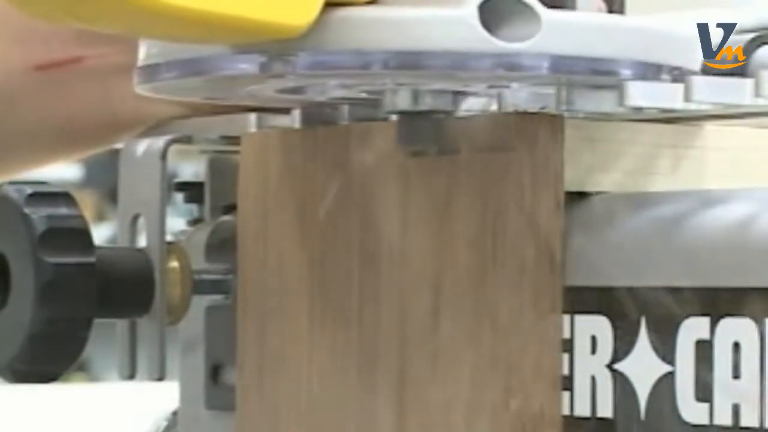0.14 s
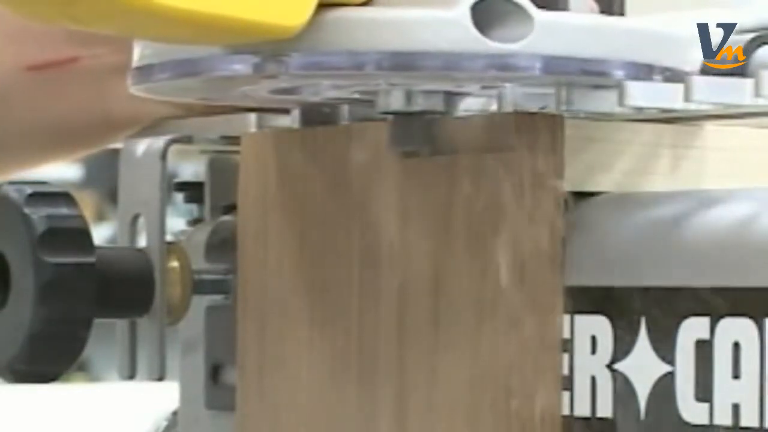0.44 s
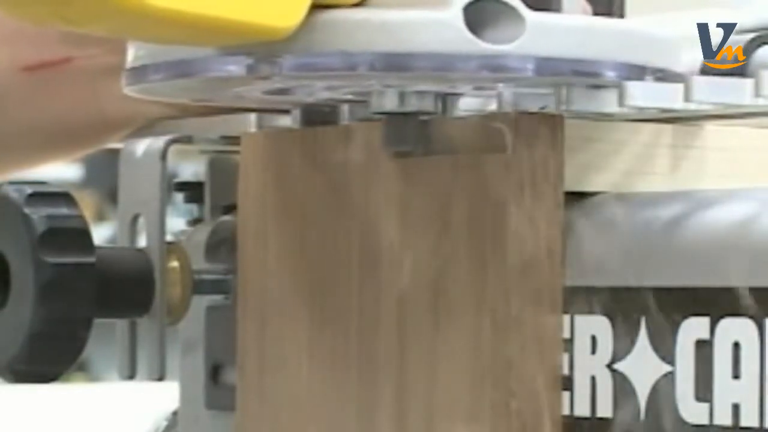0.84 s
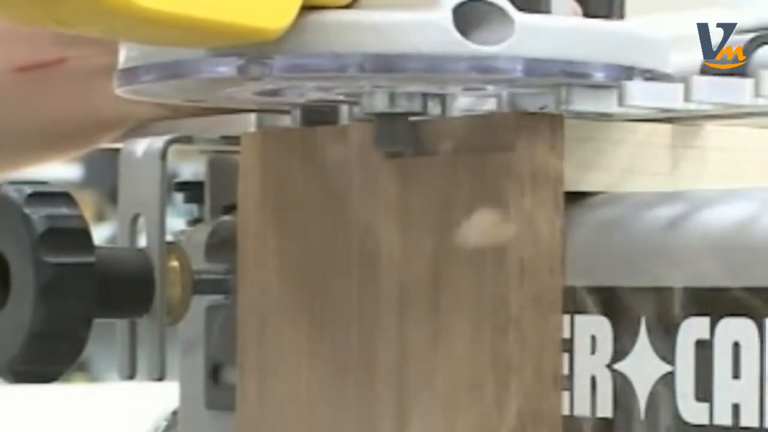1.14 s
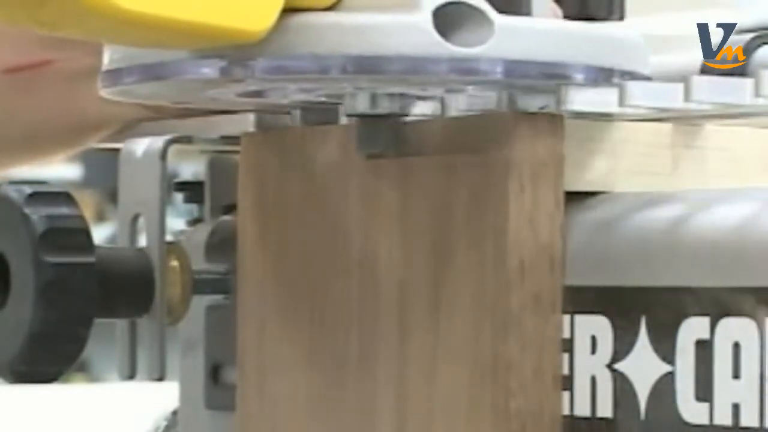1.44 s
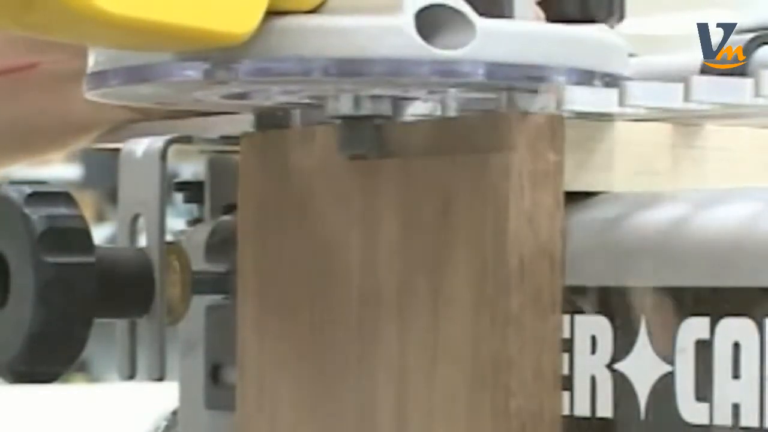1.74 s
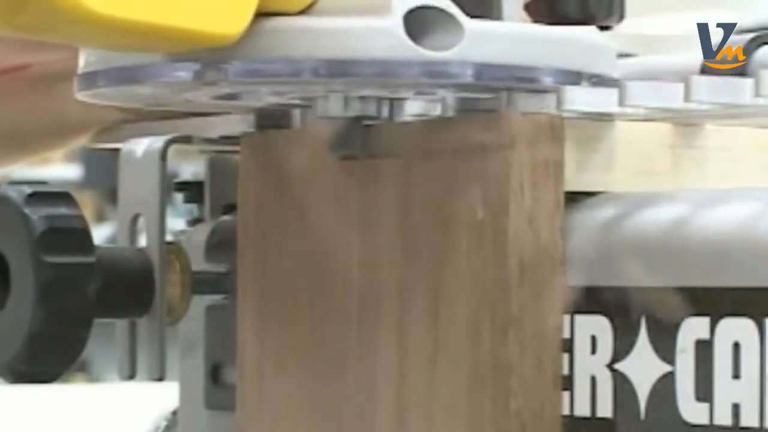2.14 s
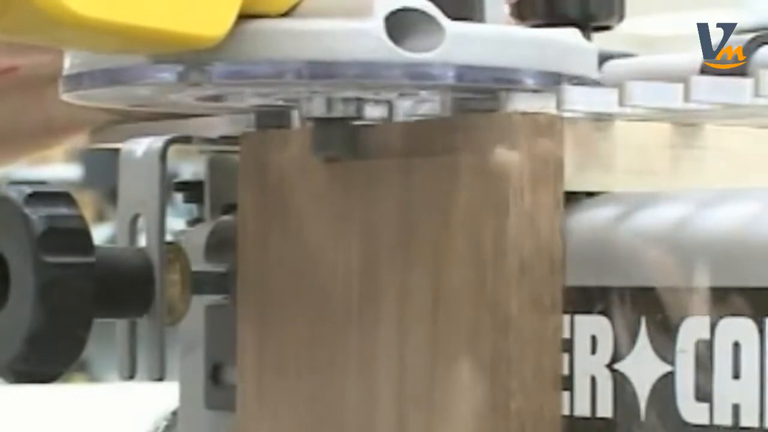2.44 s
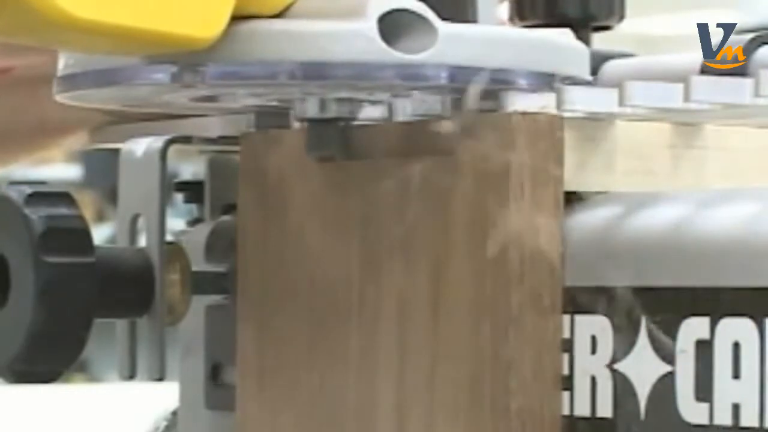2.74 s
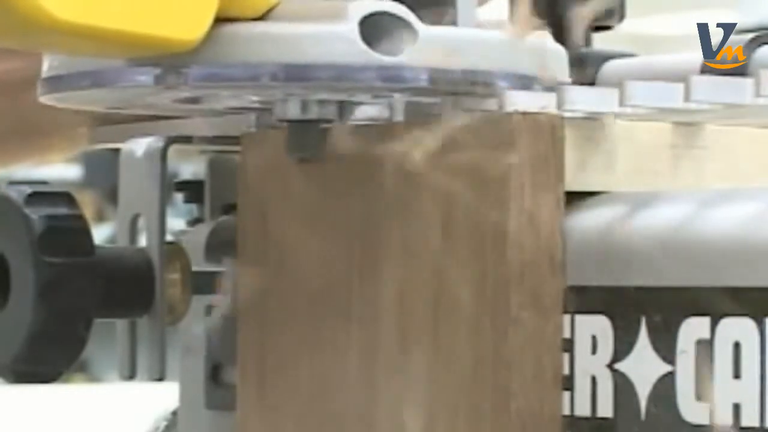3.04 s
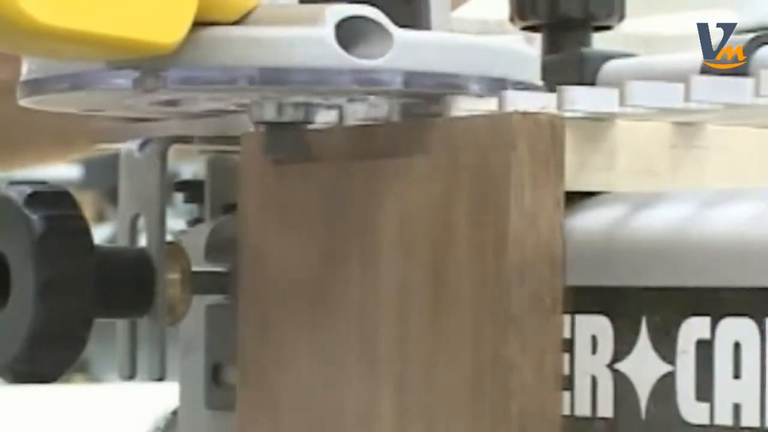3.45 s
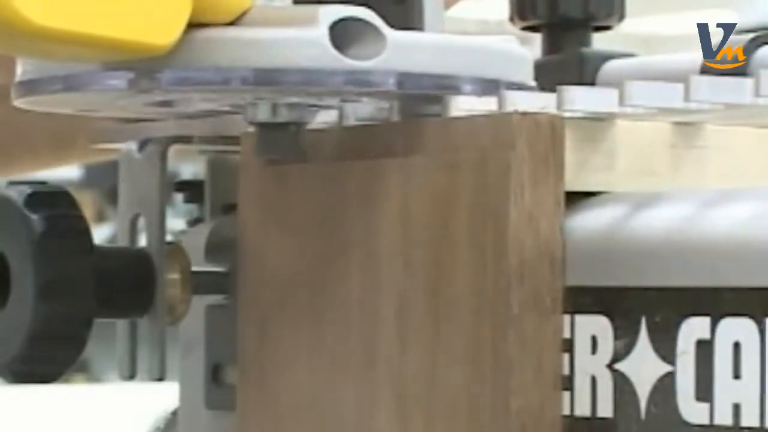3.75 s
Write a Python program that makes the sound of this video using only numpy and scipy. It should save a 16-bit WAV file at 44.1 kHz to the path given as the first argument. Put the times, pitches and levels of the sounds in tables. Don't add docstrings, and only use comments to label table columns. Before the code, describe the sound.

An electric router runs throughout, close in mono in a workshop: a dense high-speed whine of many steady tones over rushing fan air and fine chip hiss. From 0 to 1.2 s it is fairly even, its pitch easing down. Wood resonance swells around 1.6 s, 2.3 s and 3.1-3.4 s, with brief load dips near 2.5 and 2.75 s. Pitch sags lowest near 3.45 s, then recovers slightly; very faint low bumps lie beneath, and cutting continues to the end.

```python
import sys
import numpy as np
from scipy import signal
from scipy.fft import rfft, irfft, next_fast_len
from scipy.io import wavfile
from scipy.ndimage import uniform_filter1d, map_coordinates

SR = 44100
rng = np.random.default_rng(int(sys.argv[2]) if len(sys.argv) > 2 else 0)


def gain_from_db(level_db):
    decades = np.asarray(level_db, float) / 20
    return 10 ** decades


def persist_wave(psi):
    counts = np.round(np.clip(psi, -1, 1) * 32767).astype(np.int16)
    wavfile.write(sys.argv[1], SR, np.atleast_2d(counts).T)


N = 171990
MIDDLE_HZ = 398

# centre_hz, half_width_hz, gain_db
COMB_ECHOES = [(580, 37, -2), (1524, 31, -2), (1670, 50, 1.5), (1810, 71, -1.5), (3320, 110, -1.5),
               (3594, 110, 2.5), (4170, 52, -1), (5040, 86, 2.5), (5780, 120, -2), (7300, 160, -2),
               (8150, 150, -2)]


def unit(x):
    return x / np.sqrt(np.mean(x ** 2) + 1e-20)


def clock():
    return np.arange(N) / SR


def curve(rows):
    return np.interp(clock(), *np.transpose(rows))


def wobble(rate_hz):
    return map_coordinates(rng.standard_normal(400), [clock() * rate_hz], order=2)


def swell(middle_s, half_s):
    away = np.abs((clock() - middle_s) / half_s)
    return np.exp(-away ** 3)


def rush(spectrum, resonances, patchy_db):
    # time_s, centre_hz
    notch_path = [(0, 10250), (2, 10250), (2.6, 10400), (3.9, 10600)]
    notch_depth_db, notch_width_hz = -6, 400
    band_hz, frame_s, cells = signal.stft(rng.standard_normal(N + 8192), SR, nperseg=512)
    patches = uniform_filter1d(rng.standard_normal(cells.shape), 6, 0)
    patches = unit(uniform_filter1d(patches, 14, 1))
    notch_hz = np.interp(frame_s, *np.transpose(notch_path))
    notch_db = notch_depth_db * np.exp(-((band_hz[:, None] - notch_hz) / notch_width_hz) ** 2)
    noise = signal.istft(cells * gain_from_db(patchy_db * patches + notch_db), nperseg=512)[1]

    hz = np.fft.rfftfreq(len(noise), 1 / SR)
    point_hz, point_db = np.transpose(spectrum)
    colour_db = np.interp(np.log(hz + 1), np.log(point_hz), point_db)
    for centre_hz, width_hz, gain_db in resonances:
        colour_db += gain_db * np.exp(-((hz - centre_hz) / width_hz) ** 2)
    return unit(irfft(rfft(noise) * gain_from_db(colour_db), len(noise))[:N])


def order_tone(turns, multiple, sway_db):
    flutter_db, phase_sway_rad = 0.5, 0.1
    phase = 2 * np.pi * (multiple * turns + rng.random()) + phase_sway_rad * wobble(29.9)
    level_db = sway_db * wobble(4.03) + flutter_db * wobble(25.05)
    return np.sqrt(2) * np.sin(phase) * gain_from_db(level_db)


def bench_bumps():
    # middle_s, level_db
    bumps = [
        (2.33, -74),
        (3.01, -74),
        (3.37, -75),
    ]
    thud_hz, thud_s = 45, 0.056
    out = np.zeros(N)
    for middle_s, level_db in bumps:
        t = clock() - middle_s
        out += gain_from_db(level_db) * np.exp(-(t / thud_s) ** 2) * np.sin(2 * np.pi * thud_hz * t)
    return out


def cooling_air(speed_hz):
    # freq_hz, density_db_per_hz
    air_spectrum = [(25, -20.5), (120, -23.5), (330, -17), (650, -3.5), (2000, -5.5), (7600, -9),
                    (12500, -18.5), (15600, -35)]
    # centre_hz, half_width_hz, gain_db
    housing = [(850, 270, 6.5), (1089, 30, -7), (1250, 25, -11), (1445, 254, 3.5), (3040, 430, 2),
               (6210, 570, 6), (8670, 750, -7.5), (11600, 840, 3), (13450, 350, 5), (9400, 170, 1.5)]
    level_db = -45.5 + 0.1227 * (speed_hz - MIDDLE_HZ)
    return gain_from_db(level_db) * rush(air_spectrum, housing + COMB_ECHOES, patchy_db=0.75)


def motor_tones(turns):
    # shaft_multiple, rms_db
    shaft_orders = [(1, -67.5), (3, -69), (13, -64.5), (18, -67), (19, -53.5), (20, -74), (21, -74),
                    (23, -86), (25, -87), (27, -87), (29, -79.5), (31, -77), (35, -98), (37, -96),
                    (38, -90)]
    # shaft_sideband, rms_db
    ball_sidebands = [
        (-1, -61),
        (0, -76),
        (1, -56.5),
    ]
    # middle_s, half_length_s, shaft_multiple, change_db
    grip = [(1.11, 0.3, 19, -7), (0.11, 0.24, 19, -4), (3.12, 0.31, 1, -8), (0.94, 0.47, 4.86, 9),
            (2.07, 0.23, 6.86, 4.5), (3.4, 0.44, 6.86, -2.5), (0.71, .8, 21, 6), (0.93, 0.27, 1, -2.5),
            (2.028, 0.21, 19, 2), (.65, .65, 29, 12), (.7, .3, 20, -2), (2.95, .2, 38, 13),
            (1.9, .4, 38, 9), (1.6, 0.14, 13, 7), (2.2, 0.45, 13, 3), (.75, 0.27, 6.86, -1.5),
            (0.79, .15, 4.86, -3), (3.2, .5, 20, 7), (1.65, 0.096, 20, 6), (2.35, .5, 21, -3),
            (1.25, .12, 38, 10), (1.13, .12, 19, 0), (1.36, 0.088, 19, 2.5), (2.85, .4, 21, 3)]
    ball_pass = 5.86
    orders = [(round(k), db) for k, db in shaft_orders]
    orders += [(ball_pass + round(k), db) for k, db in ball_sidebands]
    out = np.zeros(N)
    for multiple, level_db in orders:
        grip_db = np.zeros(N)
        for middle_s, half_s, gripped, change_db in grip:
            if abs(gripped / multiple - 1) < 1 / 80:
                grip_db += change_db * swell(middle_s, half_s)
        out += gain_from_db(level_db + grip_db) * order_tone(turns, multiple, sway_db=0.8)
    return out


def chip_hiss(speed_hz, load_db):
    # freq_hz, density_db_per_hz
    chip_spectrum = [(1500, -30), (3300, -18), (3700, 3.5), (4800, 3.5), (5600, -2.5), (6200, -12.5),
                     (7500, -16.5), (12000, -26.5)]
    level_db = -49 + 0.24 * (speed_hz - MIDDLE_HZ) + 0.082 * load_db
    return gain_from_db(level_db) * rush(chip_spectrum, COMB_ECHOES, patchy_db=1.5)


def flute_tones(turns, load_db):
    # shaft_multiple, rms_db
    flute_orders = [(2, -65.5), (4, -64), (5, -63), (6, -61.5), (7, -61), (8, -64), (9, -72), (10, -54),
                    (11, -60.5), (12, -65.5), (14, -67), (15, -66), (16, -65), (17, -71), (22, -81),
                    (24, -78.5), (26, -80), (28, -82), (30, -86), (32, -86), (34, -87), (36, -90)]
    # middle_s, half_length_s, shaft_multiple, extra_rms_db
    sings = [(0.27, 0.52, 2, -56), (0.81, 0.52, 5, -63), (0.33, 0.1, 10, -54.5), (0.4, .35, 24, -67),
             (1.17, 0.37, 6, -49.5), (1.58, 0.21, 6, -42), (1.35, 0.35, 7, -54.5),
             (1.56, 0.21, 11, -57), (1.5, 0.53, 15, -57), (1.58, 0.3, 16, -52.5), (1.64, .2, 14, -60),
             (1.6, 0.33, 17, -63.5), (1.64, 0.3, 12, -55.5), (0.17, 0.17, 12, -55),
             (0.7, 0.73, 8, -61), (0.76, 0.48, 10, -59.5), (0.94, .65, 28, -67), (0.5, .35, 6, -56),
             (1.72, 0.055, 6, -52.5), (1.95, .1, 6, -57.5), (1.6, .12, 12, -61),
             (1.71, 0.084, 10, -59), (1.1, .4, 11, -65),
             (2.315, 0.1, 6, -44.5), (2.4, 0.12, 16, -56), (2.3, .08, 14, -67), (2.375, 0.11, 10, -46),
                  (2.534, 0.47, 7, -56), (2.535, 0.25, 12, -47.5), (2.5, 0.22, 4, -60),
                  (3.09, 0.23, 12, -45), (3.115, 0.22, 10, -48.5), (3.03, 0.24, 8, -55),
                  (2.86, 0.32, 5, -60.5), (3.2, 0.33, 11, -53), (2.97, 0.25, 4, -55.5),
                  (3.34, 0.16, 4, -52.5), (3.377, 0.2, 6, -47), (3.57, 0.35, 9, -62), (3.7, 0.33, 16, -58),
                  (2.33, 0.1, 8, -57), (2.58, 0.17, 8, -61.5), (2.95, .08, 10, -54), (2.38, 0.062, 6, -56),
                  (3.02, 0.067, 6, -58), (3.42, 0.071, 12, -57.5), (3.0, .06, 12, -61),
                  (2.3, 0.066, 4, -62), (2.35, 0.11, 16, -57.5), (3.2, 0.041, 10, -58),
                  (1.45, 0.088, 10, -63), (2.82, 0.11, 7, -57), (2.585, 0.081, 10, -51),
                  (2.59, 0.061, 6, -55), (2.94, 0.1, 6, -54.5), (3.715, 0.12, 6, -51.5),
                  (3.605, 0.35, 4, -58.5), (3.104, .15, 28, -75), (3.6, 0.1, 14, -60),
                  (3.707, 0.19, 11, -60),
             (.35, 0.22, 26, -73), (1.652, 0.16, 26, -71), (2.3, 0.073, 26, -72),
                   (3.05, .15, 26, -74), (1.5, .3, 30, -70), (2.2, .2, 30, -73), (1.68, .08, 32, -74),
                   (2.7, .4, 32, -72), (1.2, .15, 22, -75), (3.7, .08, 22, -73), (0.96, .5, 24, -72),
                   (2.993, .25, 24, -75), (0.98, 0.36, 2, -59), (1.326, 0.054, 2, -57), (0.2, .2, 2, -65.5),
                   (1.71, .1, 16, -63), (2.2, .4, 24, -77), (3.5, 0.17, 24, -78), (3.75, 0.18, 26, -78),
                   (3.2, .12, 28, -75), (3.75, .15, 28, -76), (2.05, .2, 16, -66), (1.07, 0.21, 12, -58),
                   (3.8, .1, 8, -65), (3.7, 0.37, 2, -61), (1.634, 0.17, 8, -59)]
    out = np.zeros(N)
    for multiple, level_db in flute_orders:
        level = np.full(N, gain_from_db(level_db))
        for middle_s, half_s, sung, extra_db in sings:
            if round(sung) == round(multiple):
                level += gain_from_db(extra_db) * swell(middle_s, half_s)
        out += level * order_tone(turns, round(multiple), sway_db=0.6)
    return gain_from_db(load_db) * out


def scene():
    # time_s, speed_hz
    speed_rows = [(0.1, 407.8), (0.19, 405.8), (0.42, 404.1), (0.87, 404), (1.14, 401), (1.3, 399.2),
                  (1.8, 392.6), (2.19, 397), (2.27, 395.8), (2.42, 393.5), (2.63, 394.2), (2.88, 396),
                  (3.18, 391.8), (3.39, 388), (3.45, 387.4), (3.53, 388.2), (3.65, 390.4), (3.83, 392.5)]
    # time_s, load_db
    load_rows = [(0, -1), (.2, -0.5), (.38, -0.5), (.55, -2), (1.3, 0), (1.45, -0.5), (1.75, -0.5),
                 (1.85, 0), (2.15, 1.5), (2.32, 1), (2.47, -5.5), (2.6, 0.5), (2.75, -4), (2.9, 0),
                 (3.2, -0.5), (3.4, 0), (3.55, -1.5), (3.9, 0.5)]
    speed_hz, load_db = curve(speed_rows), curve(load_rows)
    turns = np.cumsum(speed_hz) / SR
    router = cooling_air(speed_hz) + motor_tones(turns)
    cut = chip_hiss(speed_hz, load_db) + flute_tones(turns, load_db)
    mono = bench_bumps() + router + cut
    return np.array([mono, mono])


def band_limit(x):
    return signal.sosfilt(signal.butter(12, 15650, fs=SR, output="sos"), x)


def record(dry):
    top_hz, roll_hz = 15400, 150
    size = next_fast_len(N + 4096)
    hz = np.fft.rfftfreq(size, 1 / SR)
    roll = gain_from_db(-6 * np.clip((hz - top_hz) / roll_hz, 0, 20))
    mix = irfft(rfft(dry, size) * roll, size)[:, :N]
    return band_limit(mix)


dry = scene()
out = record(dry)
persist_wave(out)
```